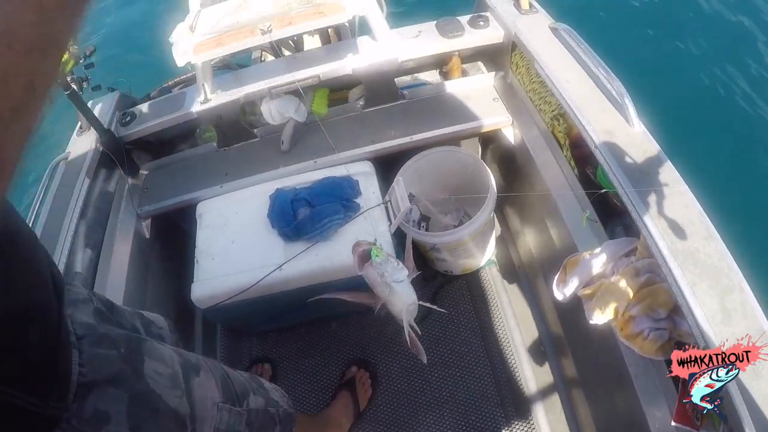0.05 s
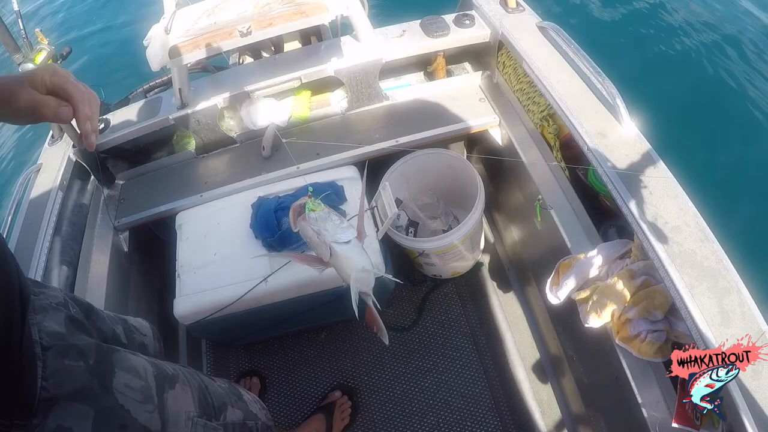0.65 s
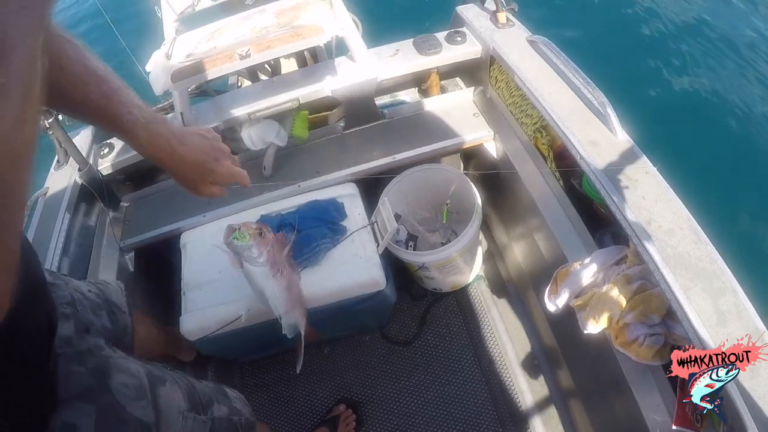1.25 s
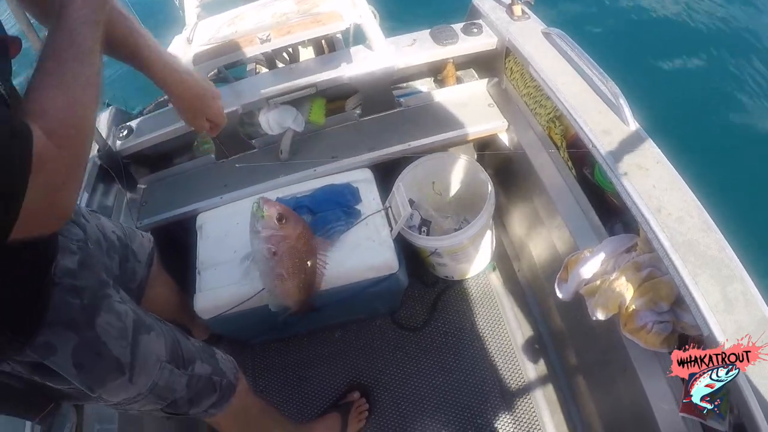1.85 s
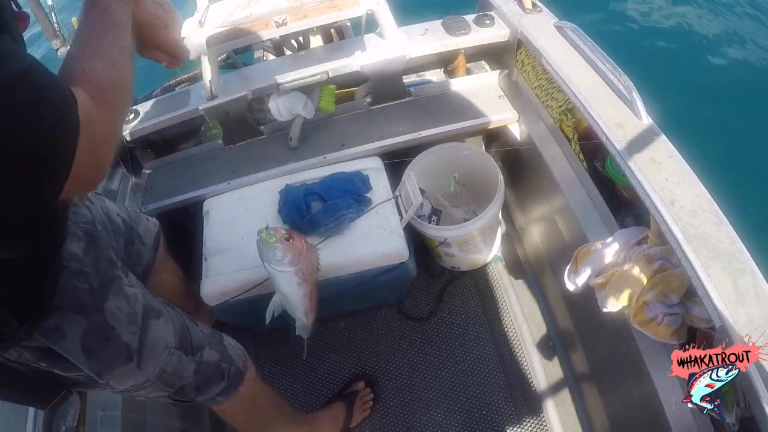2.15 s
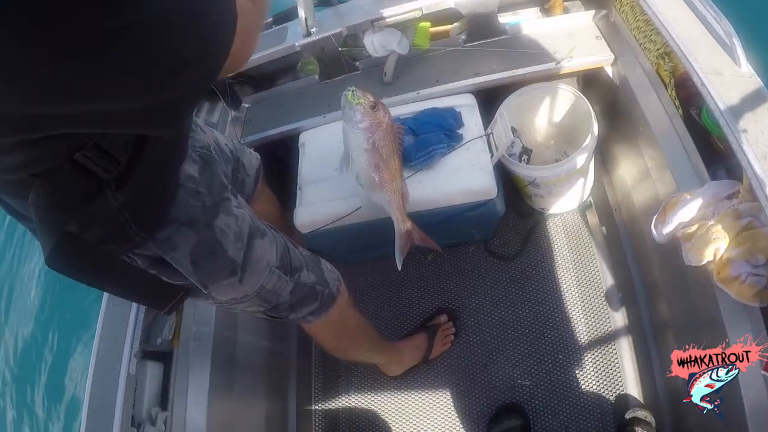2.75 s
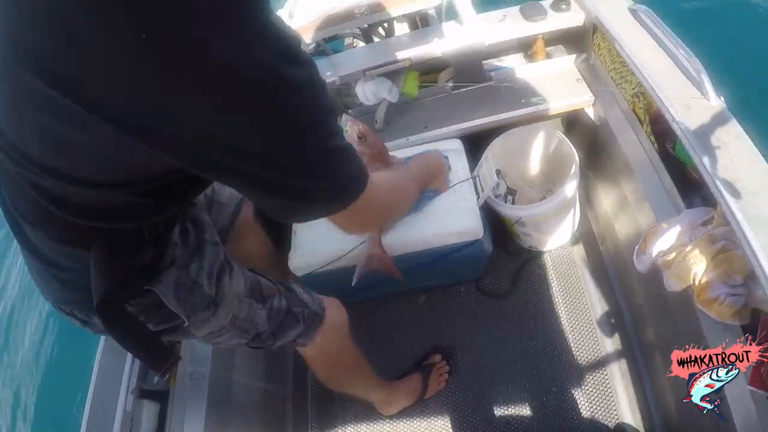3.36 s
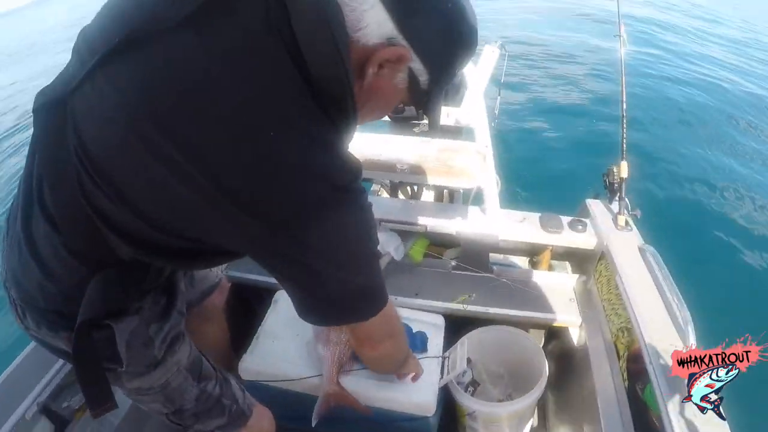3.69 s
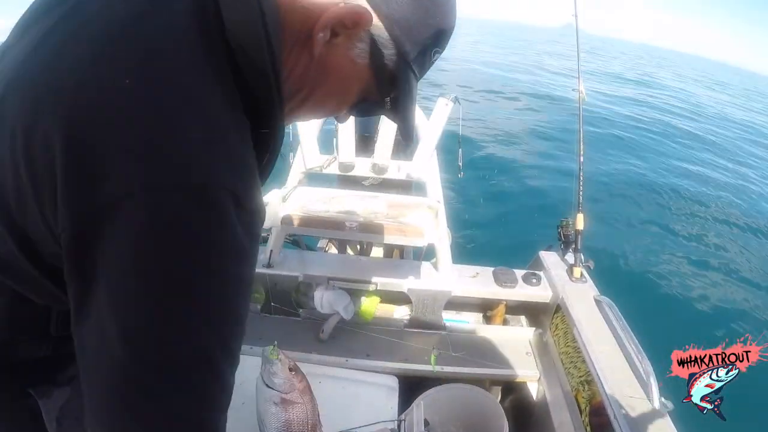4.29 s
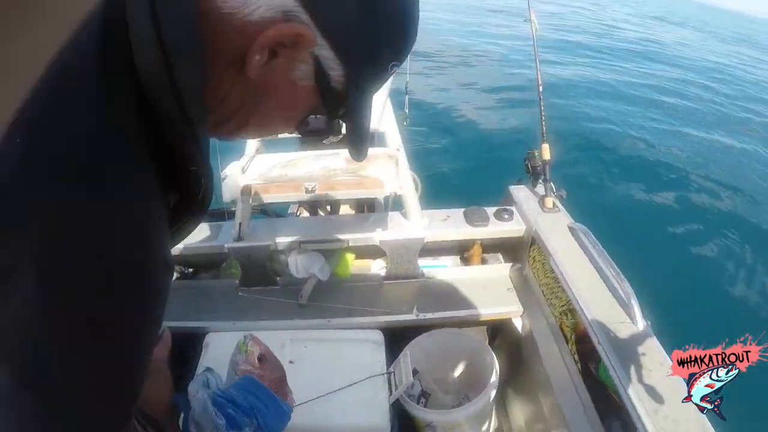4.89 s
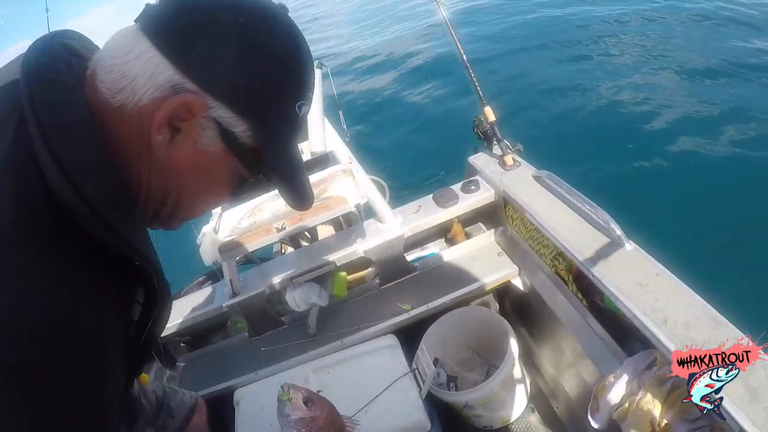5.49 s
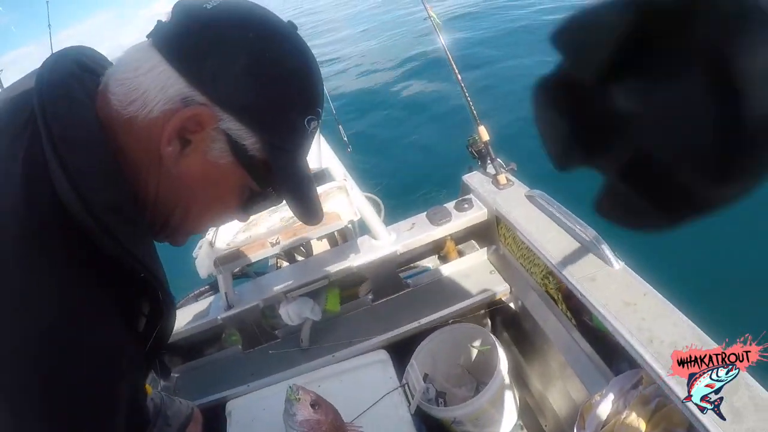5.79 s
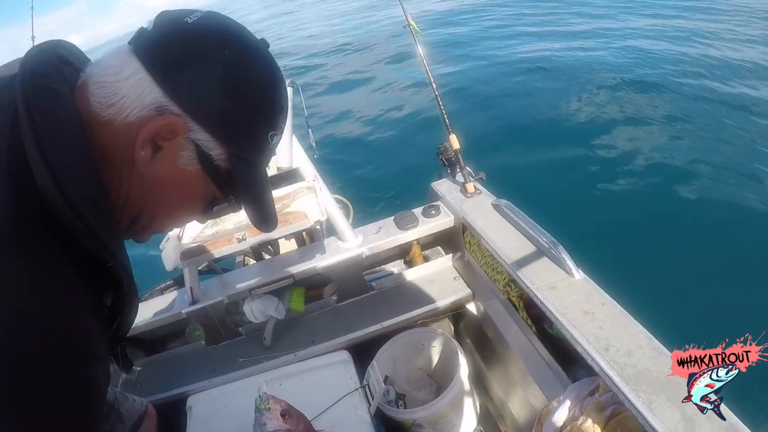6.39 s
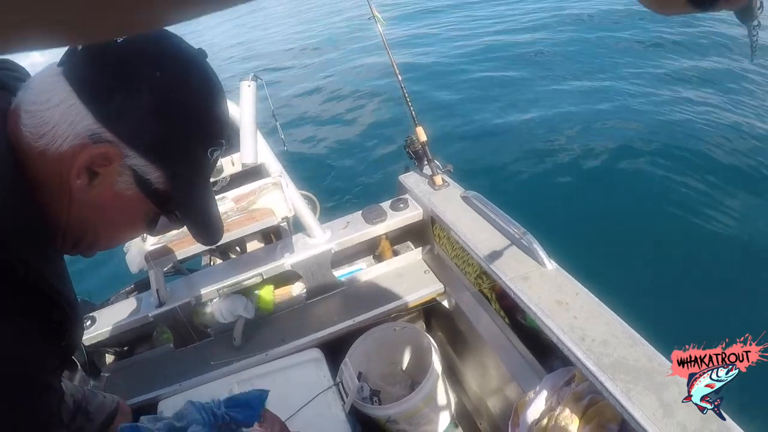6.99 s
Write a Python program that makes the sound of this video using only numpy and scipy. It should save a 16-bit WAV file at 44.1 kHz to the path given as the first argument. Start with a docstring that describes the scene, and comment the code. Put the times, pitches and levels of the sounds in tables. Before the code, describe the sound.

Small waves lap softly under a drifting metal boat. At about 0.4 seconds a caught fish starts thrashing on a cool box: quick, irregular hollow thumps and lid knocks, with metallic deck clatter, rattling gear, sharp clicks and wet tail slaps. It eases around 1.2 seconds, picks up again from 1.8 and dies down by 3.2. From about 2.2 seconds clothing and fingers rub and bump the body-worn microphone, making close low thuds, rumble and scratchy rustle, with air buffeting near 3.3. Another flurry of thrashing runs from 4.1 to 4.6 seconds, followed by a loud knock and brush on the microphone at 4.7. A few sharp wet slaps and clicks come near 5.6. Until the end, just after 7 seconds, water gulps and gurgles under the hull among scattered handling bumps and faint slaps.

```python
"""Small waves lap under a drifting aluminium boat; then a hooked fish thrashes on a cool box aboard.
Its blows boom in the box, ring the lid, clatter on the deck plates and rattle loose gear; its wet tail
slaps. Air pockets trapped under the hull gulp and gurgle. Clothing and fingers rub and bump the housing
of a small body-worn camera close by, and air buffets its two microphone ports."""
import sys
import numpy as np
from scipy import signal
from scipy.fft import rfft, irfft
from scipy.io import wavfile
from scipy.ndimage import uniform_filter1d

SR = 44100
rng = np.random.default_rng(int(sys.argv[2]) if len(sys.argv) > 2 else 0)


def inscribe(sig):
    """Save sig as 16-bit PCM at rate SR to the path in sys.argv[1].

    A 1-D sig is mono; a 2-D sig holds one channel per row.
    Samples are clipped to [-1, 1] before scaling.
    """
    pcm = np.round(np.clip(np.atleast_2d(sig).T, -1, 1) * 32767)
    wavfile.write(sys.argv[1], SR, pcm.astype(np.int16))


N = 319453
HIT = int(.4 * SR)  # samples per event
AGE_S = np.arange(HIT) / SR


def undb(db):
    """Decibels to gain."""
    return 10 ** (np.asarray(db) / 20)


def unit(x):
    """Scale to rms 1."""
    return x / np.sqrt(np.mean(x ** 2))


def early(x, window_s):
    """Scale to rms 1 over the opening window."""
    return x / np.sqrt(np.mean(x[..., :int(window_s * SR)] ** 2))


def curve(rows):
    """Interpolate (t/s, value) rows at every sample."""
    return np.interp(np.arange(N) / SR, *np.transpose(rows))


def pan(db):
    """Stereo gains for a left-minus-right level."""
    gains = np.vstack([undb(db / 2), undb(-db / 2)])
    return gains / np.sqrt(np.mean(gains ** 2, axis=0))


def add(out, t, x):
    """Mix x in at t seconds."""
    i = max(int(t * SR), 0)
    out[:, i:i + x.shape[1]] += x[:, :max(N - i, 0)]


def noise(size, side):
    """Stereo noise with a given side amplitude."""
    mid, other = rng.standard_normal((2, size))
    return np.array([mid + side * other, mid - side * other])


def walk(rate_hz):
    """Smooth random drift, rms 1."""
    hold = int(SR / rate_hz)
    steps = np.repeat(rng.standard_normal(N // hold + 1), hold)
    return unit(uniform_filter1d(uniform_filter1d(steps, hold), hold)[:N])


def ticks(per_s, spread_db):
    """Random contacts of uneven size, rms 1."""
    chance, size, sign = rng.random(N), rng.exponential(size=N), rng.choice([-1, 1], N)
    return unit((chance < per_s / SR) * sign * undb(spread_db * np.minimum(size, 3.5)))


def highpass(x, hz):
    """Second-order bass cut."""
    return signal.sosfilt(signal.butter(2, hz, "highpass", fs=SR, output="sos"), x)


def colour(x, spectrum):
    """Minimum-phase filter through (f/Hz, level/dB) points."""
    size = 8192
    hz, db = np.transpose(spectrum)
    bins_hz = np.arange(size // 2 + 1) * SR / size
    log_gain = np.log(undb(np.interp(np.log(bins_hz + 1), np.log(hz), db)))
    cepstrum = irfft(log_gain)
    cepstrum[1:size // 2] *= 2
    cepstrum[size // 2 + 1:] = 0
    impulse = irfft(np.exp(rfft(cepstrum)))
    return signal.fftconvolve(x, impulse[None], axes=1)[:, :x.shape[1]]


def onset(rise_s):
    """Exponential rise to 1."""
    return 1 - np.exp(-AGE_S / max(rise_s, 1e-5))


def fade(t60_s):
    """Free decay."""
    return np.exp(-np.log(1000) * AGE_S / max(t60_s, 1e-3))


def gesture(t, length_s, rise_s, release_s):
    """Rise, hold and die away."""
    age = np.arange(N) / SR - t
    attack = np.clip(age / max(rise_s, 1e-3), 0, 1)
    return attack * np.exp(-np.clip((age - length_s) / max(release_s, 1e-3), 0, 20))


def burst(spectrum, t60_s, tail_s, tail_db, rise_s, side, window_s):
    """Dense struck modes as noise: a crack plus a weaker tail with a T60 of tail_s."""
    envelope = (fade(t60_s) + undb(tail_db) * fade(tail_s)) * onset(rise_s)
    return early(colour(noise(HIT, side) * envelope, spectrum), window_s)


def ring(modes, t60_s, scatter_db, detune, port_rad, rise_s, centre_hz, octaves):
    """Struck (f/Hz, level/dB, T60 factor) modes; the contact favours those near centre_hz."""
    hz, db, factor = np.transpose(modes)[:, :, None]
    size, tune, place, port = rng.standard_normal((4, len(modes), 1))
    gain = undb(db + scatter_db * size) / (1 + (np.log2(hz / centre_hz) / octaves) ** 2)
    life_s = np.clip(t60_s * factor, .02, .33)  # every mode's ring time is held between 0.02 and 0.33 s
    decay = gain * np.exp(-np.log(1000) * AGE_S / life_s)
    phase = 2 * np.pi * hz * (1 + detune * tune) * AGE_S + 1.09 * place
    stereo = np.array([(decay * np.sin(phase + sign * port_rad * port)).sum(0) for sign in (1, -1)])
    return early(stereo * onset(rise_s), 0.035)


# covered ports: t/s, length/s, gain/dB
PORT_COVERS = [(3.29,0.69,-4.5), (4.687,0.25,-7), (5.009,0.12,-6.5), (5.501,0.081,-5), (5.707,0.22,-1.5)]


def cover_db():
    """Level dip while a hand or sleeve covers the ports."""
    return sum(db * gesture(t, length, rise_s=0.014, release_s=0.11) for t, length, db in PORT_COVERS)


# slosh and hiss spectra: f/Hz, level/dB
WASH_SPECTRUM = [(65, -30), (110, -15.5), (167, -3.5), (274, -1), (352, -4), (470, -8.5), (532, -14),
                 (795, -14.5), (1310, -21), (1820, -31.5), (3000, -23), (3900, -22.5), (6600, -120)]
HISS_SPECTRUM = [(880, -44), (1500, 8.5), (1900, 6), (2300, 3.5), (2700, -4.5), (6180, 6.5), (7600, 0),
                 (10000, -7.5), (14600, -22.5), (15500, -53), (16000, -83)]
# breaking ripples: t/s, length/s, level/dB
RIPPLES = [(0,0.057,-50), (0.372,0.052,-46), (0.758,0.14,-48), (1.039,0.26,-50.5), (1.48,0.044,-52),
           (1.87,0.69,-48.5), (4.607,0.074,-46.5), (5.317,0.066,-42.5), (6.15,0.53,-50.5)]


def water(wash_db=-40, hiss_db=-51.5, slosh_db=3, flicker_db=2.36):
    """Water sloshes along the hull, each band swelling on its own; ripples fizz in an airy hiss."""
    wash = np.zeros((2, N))
    for hz in 125 * 2 ** np.arange(0, 5, .5):
        band = signal.butter(2, [hz / 2 ** .25, hz * 2 ** .25], "bandpass", fs=SR, output="sos")
        wash += signal.sosfilt(band, noise(N, 0.72)) * undb(slosh_db * walk(11))
    wash = unit(colour(wash, WASH_SPECTRUM)) * undb(wash_db) * pan(0.43)
    fizz_power = sum((undb(db) * gesture(t, length, rise_s=0.0068, release_s=0.02)) ** 2
                     for t, length, db in RIPPLES)
    hiss = unit(colour(noise(N, 0.91), HISS_SPECTRUM))
    hiss *= np.sqrt(undb(hiss_db) ** 2 + fizz_power) * undb(flicker_db * walk(26))
    dip_db = cover_db()
    return wash * undb(1.9 * dip_db) + hiss * undb(dip_db)


# singing air pockets: t/s, length/s, start f/Hz, end f/Hz, level/dB
AIR_POCKETS = [(1.382, 0.051, 470, 500, -32.5), (6.408, 0.039, 296, 332, -24.5),
               (6.437, 0.042, 400, 370, -38), (7.172, 0.052, 374, 392, -35.5)]


def gurgles(waver=0.085, flutter_db=3):
    """A trapped air pocket sings, sliding and wavering in pitch as water closes on it."""
    out = np.zeros((2, N))
    for t, length, start_hz, end_hz, db in AIR_POCKETS:
        progress = np.clip(AGE_S / length, 0, 1)
        hz = (start_hz + (end_hz - start_hz) * progress) * (1 + waver * walk(246)[:HIT])
        envelope = np.sin(np.pi * progress) * undb(flutter_db * walk(63)[:HIT])
        song = np.sin(2 * np.pi * np.cumsum(hz) / SR) * envelope
        add(out, t, undb(db) * pan(-1) * early(song, length))
    return out


# waves under the hull: t/s, level/dB, first pocket f/Hz
HULL_WAVES = [(0.206, -34, 241.6), (0.27, -28.5, 271), (3.919, -32, 388), (4.862, -40.5, 306.5),
              (5.438, -37, 259.6), (5.512, -47.5, 836), (5.655, -38, 301), (5.832, -31, 328.5),
              (5.838, -44.5, 483), (6.101, -27.5, 359.6), (6.135, -31.5, 358), (6.291, -41, 406.6),
              (6.412, -40, 270), (6.459, -35.5, 271), (6.754, -38, 300), (7.036, -43, 775),
              (7.112, -35.5, 341), (7.194, -33.5, 363), (7.221, -32, 365)]


def laps(pockets=7, spread=0.2, stagger_s=.012, t60_s=0.26, glide=0.282, splash_db=-3):
    """Each wave traps air pockets under the hull; they ring amid a dull splash."""
    out = np.zeros((2, N))
    for t, db, hz in HULL_WAVES:
        gulp = np.zeros((2, HIT))
        for k, (size, late, place) in enumerate(rng.standard_normal((pockets, 3))):
            delay = int(k * stagger_s * abs(late) * SR)
            pocket_hz = hz * np.exp(spread * size * np.sqrt(k))
            phase = 2 * np.pi * pocket_hz * AGE_S * (1 + glide * AGE_S)
            pocket = np.sin(phase) * fade(t60_s) * onset(0.00045)
            gulp[:, delay:] += pan(3 * place) * pocket[:HIT - delay] / (1 + 0.62 * k)
        dull = [(hz / 3, -25), (hz, 0), (1.1 * hz, -2), (1.2 * hz, -11),
                (5 * hz, -22), (14 * hz, -45), (40 * hz, -80)]
        splash = burst(dull, t60_s=0.18, tail_s=0.13, tail_db=-26,
                       rise_s=0.0013, side=0.77, window_s=0.015)
        add(out, t, undb(db) * early(early(gulp, 0.047) + undb(splash_db) * splash, 0.11))
    return out


# gust spectrum: f/Hz, level/dB
GUST_SPECTRUM = [(10,-37), (22,7), (45,0), (70,0.5), (130,-20), (400,-72)]
# wearer's motion as airflow on the ports: t/s, level/dB
BODY_MOTION = [(0,-29), (.5,-49), (1.2,-47), (1.7,-74), (2.12,-60), (2.32,-35.5), (3.08,-27.5), (3.31,-19),
               (3.85,-25.5), (4.15,-39), (4.85,-47), (5.9,-36.5), (6.1,-25), (6.22,-41.5), (6.85,-35.5),
               (7.24,-51)]


def buffeting(swing_db=3, trim_db=0.5):
    """Air tumbles over the ports as the wearer turns."""
    gusts = unit(colour(noise(N, 0.67), GUST_SPECTRUM) * undb(swing_db * walk(18)))
    return gusts * undb(curve(BODY_MOTION) + trim_db) * pan(-4)


# catching cloth: t/s, length/s, slip rate/Hz, level/dB, base f/Hz
CLOTH_CREAKS = [(3.28, 0.039, 160, -31.5, 2820), (3.35, 0.018, 300, -42, 2730),
                (3.535, 0.09, 210, -53, 2660), (4.821, 0.03, 330, -50.5, 5900),
                (5.13, 0.015, 360, -52, 5550), (5.196, 0.071, 370, -55, 5700),
                (6.064, .055, 280, -44, 4120), (6.257, 0.051, 360, -44, 6400)]


def creaks(jitter=0.16, slip_db=2, slip_s=0.001):
    """Taut cloth sticks and slips in a quick, uneven train of ticks."""
    out = np.zeros((2, N))
    for t, length, rate_hz, db, hz in CLOTH_CREAKS:
        cycles = np.cumsum(rate_hz * np.exp(jitter * walk(140)[:HIT])) / SR
        arch = np.sin(np.pi * np.clip(AGE_S / length, 0, 1))
        slips = np.exp(-(cycles % 1) / (rate_hz * slip_s)) * arch * undb(slip_db * walk(197)[:HIT])
        weave = [(hz / 3, -18), (1.26 * hz, -1), (1.09 * hz, 0), (1.19 * hz, -17), (3 * hz, -42)]
        creak = colour(noise(HIT, 0.59) * slips, weave)
        add(out, t, undb(db) * pan(1) * early(creak, 0.033))
    return out


# brushes on the housing: t/s, length/s, level/dB
BRUSHES = [(4.695, 0.084, -34), (4.837, .06, -51), (6.082, 0.048, -29)]
# brush spectrum: f/Hz, level/dB
BRUSH_SPECTRUM = [(200, -4), (400, 2), (700, -0.5), (1050, -4), (1700, -14), (2200, -20), (3500, -21),
                  (6000, -50.5)]


def rubs(grain_db=3):
    """A fingertip or sleeve brushes the housing with a dull, grainy swish."""
    press = sum(undb(db) * gesture(t, length, rise_s=0.039, release_s=0.03) for t, length, db in BRUSHES)
    friction = noise(N, 0.62) * undb(grain_db * walk(300))
    return unit(colour(friction, BRUSH_SPECTRUM)) * press * pan(-1.5)


# cloth drags: t/s, length/s, rise/s, rumble/dB, rustle/dB, rumble pan/dB
CLOTH_DRAGS = [(0,0.024,0.0036,-23.5,-60,4), (2.238,0.18,0.013,-28,-48,-25),
               (3.265,0.077,.025,-13.5,-33.5,-10), (3.342,0.33,0.016,-18.5,-34.5,-22),
               (3.596,0.5,0.016,-22,-40.5,-16.5), (4.14,0.15,0.048,-17,-45.5,-0.5),
               (4.526,0.12,0.017,-16.5,-41.5,-8.5), (4.812,0.022,.01,-16.5,-41.5,-12),
               (4.916,0.11,0.012,-30,-50.5,-16), (5.081,0.1,0.032,-27,-44.5,-10),
               (5.181,0.1,0.027,-22.5,-41.5,-8), (5.304,0.25,0.025,-32.5,-50,-3),
               (5.629,0.041,0.011,-21,-64,-14), (5.881,0.15,0.044,-27.5,-46,-27),
               (6.044,0.071,0.012,-18.5,-39.5,-6.5), (6.164,0.088,.02,-34,-48,1),
               (6.69,0.13,0.016,-39,-49.5,1), (7.183,0.069,.02,-31,-45.5,-12)]
# rumble, rustle and hollow case ring spectra: f/Hz, level/dB
RUMBLE_SPECTRUM = [(15,-31), (30,-41), (55,-2.5), (90,-1.5), (125,3.5), (160,-4.5), (205,-4.5), (300,-12.5),
                   (450,-18.5), (650,-28.5), (1000,-71.5)]
RUSTLE_SPECTRUM = [(290,-26), (500,-0.5), (815,-15), (1080,-14), (1250,-7), (1375,-10), (1520,-7.5),
                   (2100,-15), (2580,-12), (3200,-17), (3650,-13.5), (4200,-22), (5600,-16.5), (7000,-16),
                   (8000,-19.5), (8800,-32.5), (12000,-44.5), (14000,-74)]
CASE_SPECTRUM = [(290, -23), (520, -1.5), (720, -1), (1130, -13.5), (1370, -3), (1620, -12), (2050, -25),
                 (2600, -19.5), (4240, -28), (6500, -66)]


def clothing(lurch_db=4, grain_db=2, rocking_db=5, snag_db=-11, sway_db=-41, port_lag_s=8e-5):
    """Cloth drags over the housing in lurches: rumble through the case and a scratchy rustle."""
    rumble_power, rustle_power = np.zeros((2, N)), np.zeros(N)
    for t, length, rise_s, rumble_db, rustle_db, pan_db in CLOTH_DRAGS:
        drag = gesture(t, length, rise_s, release_s=0.035)
        rumble_power += (drag * undb(rumble_db) * pan(pan_db)) ** 2
        rustle_power += (drag * undb(rustle_db)) ** 2
    # the case also sways with the body
    motion_db = curve(BODY_MOTION)
    rumble_power += (undb(sway_db + 0.41 * (motion_db - motion_db.mean())) * pan(-5.5)) ** 2
    lurch = walk(35)
    rumble = unit(colour(noise(N, 0.47), RUMBLE_SPECTRUM) * undb(lurch_db * lurch))
    grains = undb(grain_db * walk(440) + 0.47 * lurch)
    snags = undb(snag_db) * ticks(per_s=150, spread_db=7.5)
    rustle = unit(colour((noise(N, 0.91) + snags) * grains, RUSTLE_SPECTRUM))
    rustle *= undb(0.7 * cover_db() + 1)
    # case resonance moves the ports in opposite directions
    case = unit(colour(rng.standard_normal((1, N)) * grains, CASE_SPECTRUM))[0]
    time_s = np.arange(N) / SR
    rocking = undb(rocking_db) * np.array([-np.interp(time_s - port_lag_s, time_s, case), case])
    return rumble * np.sqrt(rumble_power) + (rustle + rocking) * np.sqrt(rustle_power) * pan(-1.3)


# housing bumps: t/s, thud/dB, thud f/Hz, tick/dB
HOUSING_BUMPS = [(2.29,-13.5,105,-46), (2.383,-13,136,-66), (2.465,-19,49.5,-62), (2.746,-26,55,-64),
                 (3.211,-16.5,50,-47), (3.355,-12.5,63,-26), (3.431,-13.5,103,-37), (3.485,-9,116,-28.5),
                 (3.691,-13,54.5,-55), (4.083,-11.5,119,-29.5), (4.186,-13.5,103,-35), (4.387,-10,117,-41),
                 (4.543,-12,129,-21), (4.678,-5.5,274,-17.5), (4.683,-12,105,-45), (4.819,-16,133,-40),
                 (4.935,-22.5,137,-42), (5.117,-35,129,-38), (5.183,-18,99,-52), (5.235,-11.5,150,-33),
                 (6.052,-19,131,-32), (6.077,-15.5,124,-30), (6.292,-46,130,-31), (6.482,-13,117,-28.5),
                 (6.515,-17.5,93,-43), (6.664,-12,129,-27), (6.936,-14.5,127,-30)]
# housing tick spectrum: f/Hz, level/dB
TICK_SPECTRUM = [(290, -49), (500, 5), (694, -7), (841, -3), (1130, -9.5), (1350, -10.5), (1650, -0.5),
                 (2080, -13.5), (2550, -20.5), (4240, -18.5), (5000, -39), (6500, -77), (11000, -120)]


def bumps(t60_cycles=3.7, lowpass_hz=700):
    """A finger or fold meets the housing: a damped thud and a tick that rocks the ports."""
    out = np.zeros((2, N))
    soften = signal.butter(1, lowpass_hz, fs=SR, output="sos")
    for t, thud_db, hz, tick_db in HOUSING_BUMPS:
        swing = -np.sin(2 * np.pi * hz * AGE_S) * fade(t60_cycles / hz)
        thud = signal.sosfilt(soften, highpass(swing, 0.61 * hz))
        add(out, t, undb(thud_db) * pan(-16.5) * early(thud, 0.0066))
        tick = burst(TICK_SPECTRUM, t60_s=0.037, tail_s=0.037, tail_db=-31,
                     rise_s=0.00043, side=1.64, window_s=0.0061)
        add(out, t, undb(tick_db) * pan(0.22) * tick)
    return out


# hard contacts: t/s, level/dB, f/Hz
SHARP_CLICKS = [(0.427,-25.5,4160), (0.429,-16,1530), (0.508,-36,4280), (0.508,-20.5,1220),
                (0.644,-17.5,1563), (0.653,-17.5,2570), (.727,-14,2320), (0.803,-20.5,1240),
                (.841,-23,1260), (1.965,-20,3240), (1.973,-16,5000), (2.211,-20.5,7120), (2.836,-20.5,6160),
                (2.913,-21.5,6600), (4.226,-31,1520), (4.512,-17.5,2200), (4.693,-37,1490), (5.236,-35,623),
                (5.481,-38,2350), (5.608,-24.5,2550), (5.63,-19,5200), (5.63,-21.5,2550), (5.658,-28,2120),
                (2.153,-31,2630), (5.654,-20,7160), (6.207,-47,2180), (6.484,-33,3480)]


def clicks(t60_cycles=65, split=0.023, ping_db=2):
    """Small hard things such as hook, line and fin spines touch: a tick and a close pair of modes."""
    out = np.zeros((2, N))
    for t, db, hz in SHARP_CLICKS:
        peak = [(hz / 3, -30), (0.54 * hz, -15), (hz, 0),
                (1.206 * hz, -15), (1.98 * hz, -34), (5 * hz, -65)]
        tick = burst(peak, t60_s=t60_cycles / hz, tail_s=0.029, tail_db=-28,
                     rise_s=0.00044, side=0.49, window_s=0.0058)
        pair = [(hz * (1 - split), 0, 1), (hz * (1 + split), 0, 1)]
        ping = ring(pair, t60_s=t60_cycles / hz, scatter_db=-2, detune=.006,
                    port_rad=0.24, rise_s=0.00059, centre_hz=hz, octaves=1)
        click = tick + undb(ping_db) * early(ping, 0.0023)
        add(out, t, undb(db) * pan(-1.9) * early(click, 0.0031))
    return out


# tail and fin slaps: t/s, spray/dB, smack/dB, spray T60/s
TAIL_SLAPS = [(0.427, -30, -15.5, 0.011), (0.651, -46, -46, 0.022), (0.726, -25.5, -39, 0.011),
              (0.984, -38.5, -29, 0.019), (1.398, -31.5, -22.5, 0.019), (1.498, -47, -42, 0.02),
              (1.567, -43, -37, 0.13), (1.695, -47.5, -35.5, 0.042), (1.925, -37, -36, 0.05),
              (1.941, -25.5, -28, 0.042), (1.962, -23, -15.5, 0.066), (1.972, -20, -25, 0.043),
              (1.985, -21.5, -44, 0.081), (2.136, -35, -31.5, 0.2), (2.153, -23.5, -27, 0.091),
              (2.211, -25, -40, 0.066), (2.236, -26, -43, 0.12), (2.494, -30, -34.5, 0.083),
              (2.836, -20, -36, 0.1), (2.91, -23.5, -53, 0.061), (3.539, -36.5, -52, 0.029),
              (3.591, -33.5, -50, 0.043), (3.618, -38, -49, 0.04), (4.191, -36.5, -38, 0.055),
              (4.25, -23.5, -43, 0.089), (4.297, -33, -50, 0.13), (4.424, -38, -24, 0.098),
              (4.511, -34, -28, 0.061), (4.574, -40.5, -42, 0.028), (5.608, -25, -25, 0.014),
              (5.624, -23, -23.5, 0.032), (5.629, -20, -21, 0.038), (5.655, -31, -35, 0.15),
              (6.17, -35, -28, 0.011), (6.194, -43, -34, 0.012), (6.34, -45, -42, 0.012),
              (6.779, -35.5, -39, 0.028), (6.911, -44.5, -54, 0.015), (7.111, -36, -37.5, 0.043)]
# snaps of the hardest slaps: t/s, level/dB
TAIL_SNAPS = [(.726, -39), (1.941, -43), (1.964, -49), (1.972, -45), (1.985, -35), (2.154, -35),
              (2.211, -37), (2.237, -46), (2.837, -39), (2.911, -38), (5.607, -35), (5.628, -30.5),
              (5.656, -37)]
# spray, smack and snap spectra: f/Hz, level/dB
SPRAY_SPECTRUM = [(1200, -28), (2500, -5.5), (3700, -17.5), (5000, -4), (6300, 3.5), (7200, -2),
                  (8500, -14.5), (11000, -26), (15000, -54), (17000, -47)]
SMACK_SPECTRUM = [(400,4.5), (900,0), (1300,-0.5), (1700,2.5), (1950,5.5), (2350,-7.5), (2700,-1.5),
                  (3200,-0.5), (4200,-2), (7000,-35), (14000,-39)]
SNAP_SPECTRUM = [(5000, -35), (9000, 7), (13000, -5), (16000, -3)]


def slaps():
    """Wet skin smacks and throws a short spray; the hardest slaps snap."""
    out = np.zeros((2, N))
    for t, spray_db, smack_db, t60_s in TAIL_SLAPS:
        spray = burst(SPRAY_SPECTRUM, t60_s, tail_s=0.075, tail_db=-16,
                      rise_s=0.00027, side=0.78, window_s=0.0067)
        smack = burst(SMACK_SPECTRUM, 0.75 * t60_s, tail_s=0.19, tail_db=-20,
                      rise_s=0.00023, side=0.56, window_s=0.0025)
        add(out, t, undb(spray_db) * pan(0.28) * spray + undb(smack_db) * pan(-3.1) * smack)
    for t, db in TAIL_SNAPS:
        snap = burst(SNAP_SPECTRUM, t60_s=0.012, tail_s=0.083, tail_db=-12,
                     rise_s=0.0002, side=1, window_s=0.0058)
        add(out, t, undb(db) * snap)
    return out


# deck plate modes: f/Hz, level/dB, T60 factor
DECK_MODES = [(932,5,2.3), (961,0.5,2.3), (1086,3.5,1.6), (1160,5,0.7), (1205,3,0.64), (1338,7.5,0.61),
              (1398,-6,0.38), (1545,-1.5,2), (1642,5,0.39), (1690,-5,0.37), (1906,-8,.4), (2087,2.5,0.55),
              (2170,6.5,0.5), (2340,-4,0.37), (2700,2,0.33), (2860,-5,0.36), (2900,-1,0.33)]
# deck crack spectrum: f/Hz, level/dB
DECK_SPECTRUM = [(550, -12.5), (900, -5), (1180, 2.5), (1350, -5.5), (1580, -6), (1850, -3.5), (2130, -0.5),
                 (2700, -5.5), (3700, -11), (5000, -13.5), (6200, -8), (9000, -39), (16000, -113)]


def deck_clatter(hz, ring_db=-3):
    """Deck plates crack and ring; the long, fleshy contact loses the treble."""
    contact = [(hz / 3, -6), (hz, 0), (1.04 * hz, 0), (4 * hz, -16)]
    crack = burst(DECK_SPECTRUM, t60_s=0.085, tail_s=0.4, tail_db=-17,
                  rise_s=0.0003, side=0.52, window_s=.02)
    crack = early(colour(crack, contact), 0.02)
    plates = ring(DECK_MODES, t60_s=0.28, scatter_db=0, detune=0.0079,
                  port_rad=1, rise_s=0.0028, centre_hz=hz, octaves=1)
    return early(crack + undb(ring_db) * plates, 0.017)


# spells of sustained chatter: t/s, length/s, level/dB
GEAR_SPELLS = [(0.456, 0.13, -30), (.68, 0.21, -39), (4.296, 0.29, -36)]


def rattle(relative_db=-11.5, rise_s=0.033, t60_s=0.27):
    """Loose gear, shaken by each blow, chatters on the deck plates and settles."""
    power = sum((undb(db) * gesture(t, length, rise_s=0.018, release_s=0.063)) ** 2
                for t, length, db in GEAR_SPELLS)[None]
    for t, _, _, _, clatter_db, _ in FISH_BLOWS:
        shake = undb(clatter_db + relative_db) * fade(t60_s) * onset(rise_s)
        add(power, t, shake[None] ** 2)
    contact = ring(DECK_MODES, t60_s=0.027, scatter_db=6, detune=0.014,
                   port_rad=0.57, rise_s=0.00024, centre_hz=1800, octaves=0.8)
    chatter = signal.fftconvolve(ticks(per_s=260, spread_db=3.5)[None], contact, axes=1)[:, :N]
    return unit(chatter) * np.sqrt(power) * pan(-1)


# lid knock spectrum: f/Hz, level/dB
LID_SPECTRUM = [(380, -53.5), (520, 2.5), (600, 5.5), (690, 5.5), (820, -8.5), (1000, -8), (1400, -16.5),
                (2500, -88)]
# lid modes: f/Hz, level/dB, T60 factor
BOX_LID_MODES = [(569, -9, 1.2), (609.6, -14, 1.2), (681, 6.5, 0.49), (715, -0.5, 1.36), (773, -4, 1.45),
                 (882, -5.5, 1.34)]


def lid_knock(ring_db=-4):
    """The struck lid knocks and rings."""
    knock = burst(LID_SPECTRUM, t60_s=0.087, tail_s=0.5, tail_db=-4,
                  rise_s=0.00049, side=0.56, window_s=0.011)
    modes = ring(BOX_LID_MODES, t60_s=0.2, scatter_db=6.5, detune=0.0097,
                 port_rad=0.38, rise_s=0.0033, centre_hz=683, octaves=0.92)
    return early(knock + undb(ring_db) * modes, 0.024)


# box modes: f/Hz, level/dB, T60 factor
BOX_MODES = [(148.8,-3,2.7), (171.5,-5,2), (188.4,-12,2.4), (213.7,-4,1.8), (237.4,-5,1.66), (259,-8,1.6),
             (277,1.5,0.83), (305.3,-0.5,0.78), (323,9,0.31), (362,-20.5,2.4), (389.5,-1,0.93),
             (415.1,1.5,0.61), (455,-3.5,0.94), (466,-6,0.69)]
# box pitch, lower at first as if loaded by the fish: t/s, ratio
BOX_PITCH = [(1.1, .93), (1.8, 1)]


def box_boom(t, hz, thump_db=-1):
    """The box thumps and booms, radiating little below its lowest mode."""
    thump = early(np.sin(2 * np.pi * hz * AGE_S) * fade(0.07) * onset(0.0016), 0.019)
    pitch_ratio = np.interp(t, *np.transpose(BOX_PITCH))
    modes = np.array(BOX_MODES) * [pitch_ratio, 1, 1]
    boom = ring(modes, t60_s=0.28, scatter_db=4.5, detune=0.021,
                port_rad=0.34, rise_s=0.0053, centre_hz=hz, octaves=0.66)
    radiated = highpass(highpass(boom + undb(thump_db) * thump, hz=131), hz=125)
    return early(radiated, 0.038)


# blows: t/s, boom/dB, boom f/Hz, lid/dB, clatter/dB, clatter f/Hz
FISH_BLOWS = [(.426,-17.5,210,-26,-15,1590), (0.507,-24.5,257,-26.5,-23.5,1160),
              (.585,-27.5,300,-38,-36,1160), (0.641,-25.5,305,-53,-23.5,1050),
              (0.654,-21,290,-25,-20.5,1930), (0.726,-20,267,-25.5,-21,2040),
              (.801,-19.5,276,-19.5,-26.5,1190), (.838,-17.5,298,-22.5,-26,1040),
              (0.852,-31,320,-31,-27.5,2030), (.953,-13.5,288,-21.5,-21.5,1750),
              (.968,-20,240,-30,-40,1770), (.995,-19.5,240,-28,-52,1300), (1.012,-30,267,-38,-55,1300),
              (1.065,-29,253,-32.5,-39,1090), (1.157,-30,188,-43,-46.5,900), (1.393,-29,426,-47,-63,1750),
              (1.449,-23.5,272,-35,-48,910), (1.574,-40.5,284,-61,-38,1650), (1.683,-33,287,-43,-61,1510),
              (1.845,-14.5,288,-23.5,-25,1560), (1.895,-19,207,-45,-40,1190), (1.972,-17,187,-34,-29,2520),
              (2.017,-28,202,-29,-26.5,2270), (2.135,-17.5,293,-24.5,-28,1300),
              (2.151,-16,243,-34,-24,1820), (2.218,-16,293,-22,-28,1740), (2.309,-20.5,220,-50,-41,1425),
              (2.367,-29.5,266,-45.5,-61,1170), (2.515,-13,300,-25,-33.5,1050),
              (2.537,-24.5,251,-35,-43,1010), (2.63,-18.5,293,-29,-36,895), (2.77,-25.5,301,-42,-49,910),
              (2.8,-21.5,306,-32,-39.5,900), (2.838,-26.5,243,-41,-35,1200), (2.864,-20,220,-30.5,-24,1890),
              (2.932,-23,333,-31.5,-39,900), (3.064,-25,310,-38.5,-59,900), (3.203,-25,308,-37,-42.5,904),
              (4.114,-16.5,356,-20.5,-21.5,785), (4.249,-17,336,-23.5,-22.5,1360),
              (4.286,-19,230,-25,-19.5,1200), (4.296,-29,271,-24,-21,1900), (4.369,-32,227,-36,-23,1880),
              (4.391,-21.5,220,-24,-19.5,1510), (4.42,-28,266,-27,-26.5,1260),
              (4.428,-18.5,243,-38,-20,1460), (4.48,-25,244,-29.5,-44,1100),
              (4.512,-20.5,260,-31,-20.5,1870), (4.572,-21.5,283,-28,-22,1360)]


def thrashing():
    """Each blow of the fish drives box, lid and deck at once."""
    out = np.zeros((2, N))
    for t, boom_db, boom_hz, lid_db, clatter_db, clatter_hz in FISH_BLOWS:
        add(out, t, undb(boom_db) * pan(1.5) * box_boom(t, boom_hz))
        add(out, t, undb(lid_db) * pan(-3) * lid_knock())
        add(out, t, undb(clatter_db) * pan(-4) * deck_clatter(clatter_hz))
    return out


def scene():
    """Everything aboard, in the open air."""
    fish = thrashing() + rattle() + slaps() + clicks()
    wearer = bumps() + clothing() + rubs() + creaks() + buffeting()
    waves = laps() + gurgles() + water()
    return waves + wearer + fish


def record(dry):
    """The camera loses the deepest bass, rounds peaks near full scale and cuts the top."""
    x = highpass(dry, hz=15)
    rounded = x / (1 + x ** 6) ** (1 / 6)
    top_hz = 16000
    return signal.sosfilt(signal.ellip(8, .2, 70, top_hz, fs=SR, output="sos"), rounded)


dry = scene()
out = record(dry)
inscribe(out)
```